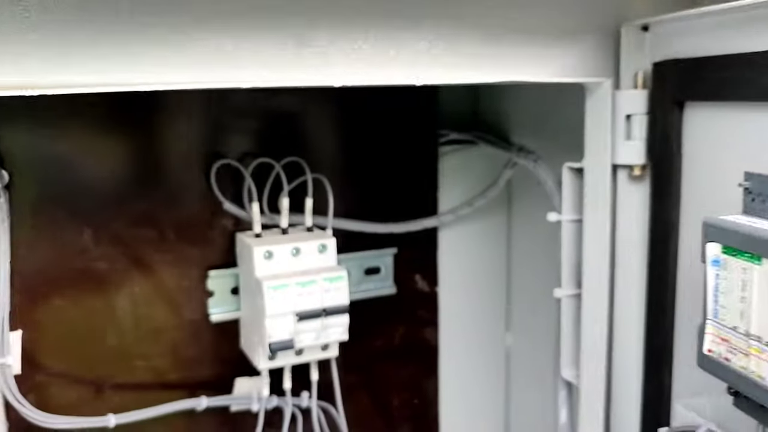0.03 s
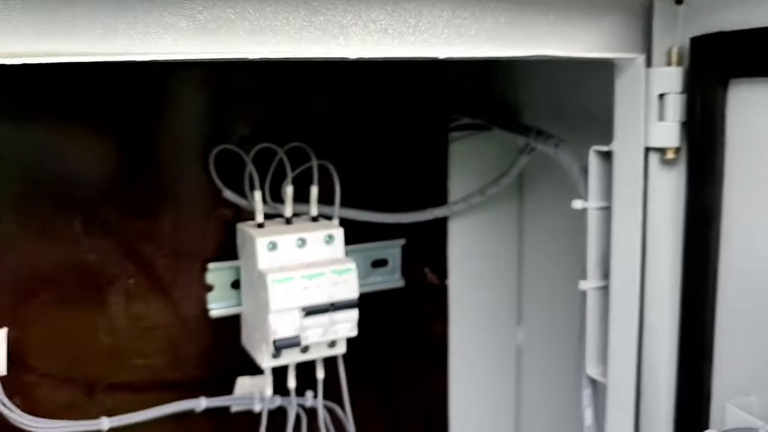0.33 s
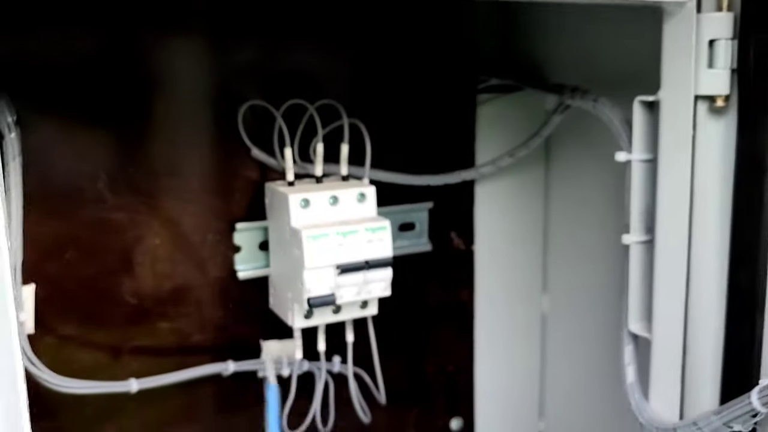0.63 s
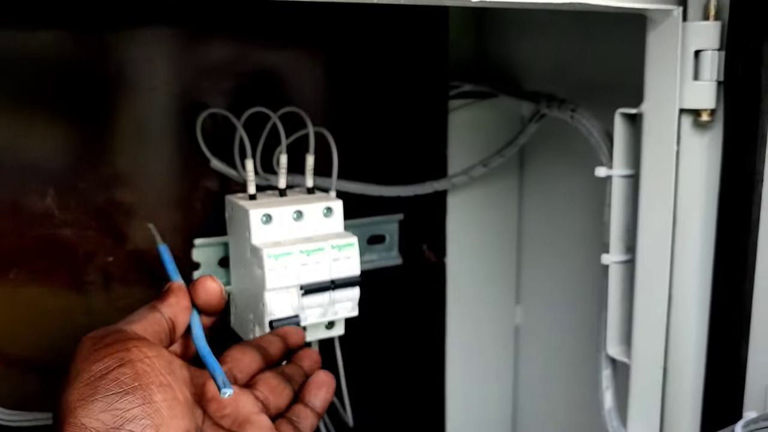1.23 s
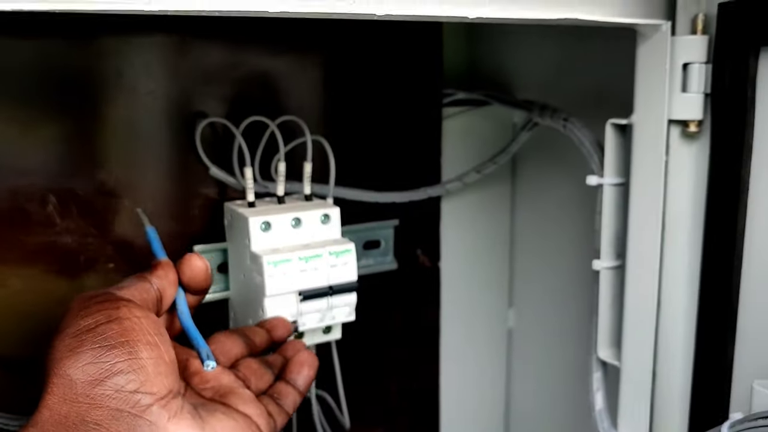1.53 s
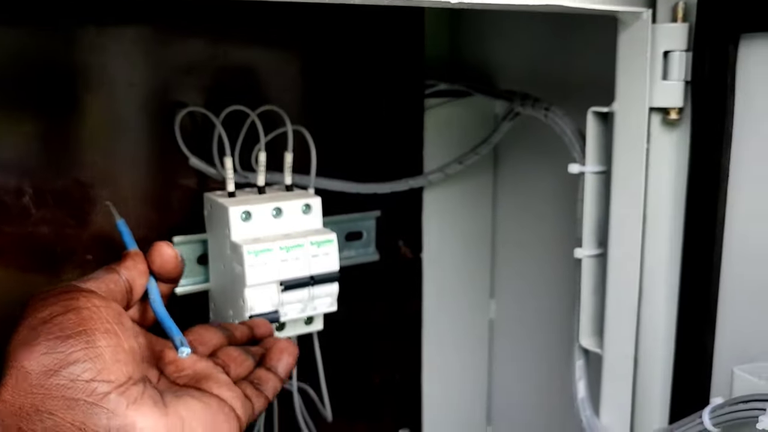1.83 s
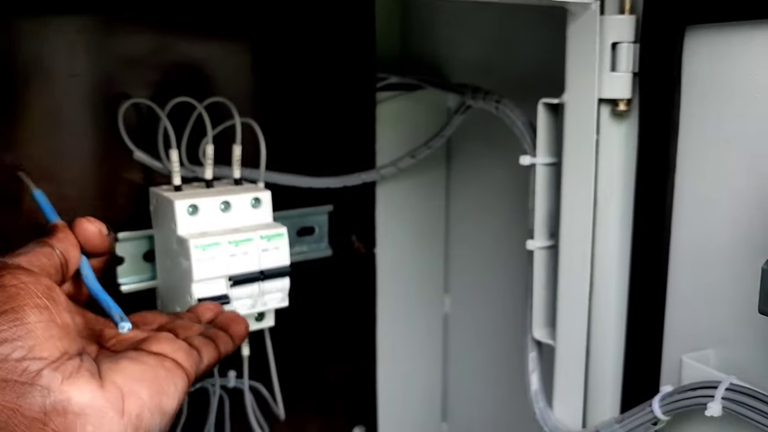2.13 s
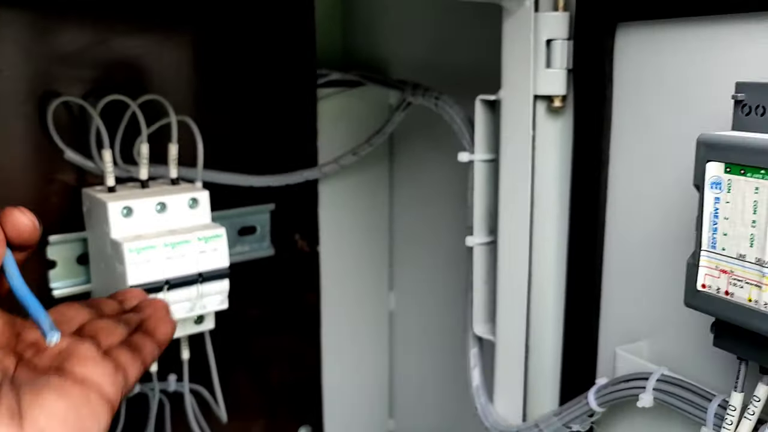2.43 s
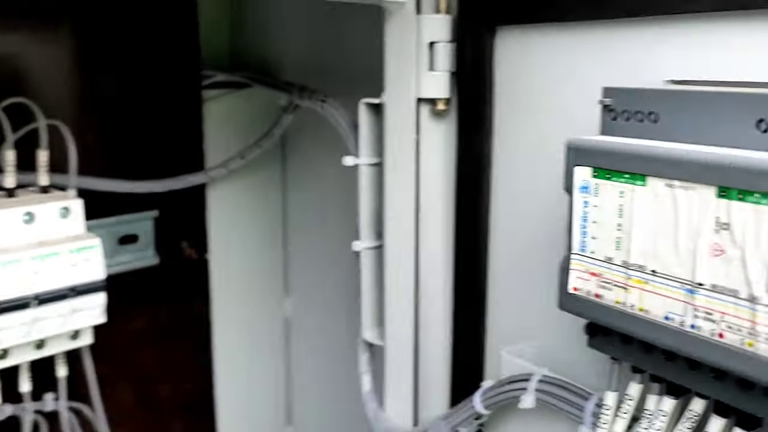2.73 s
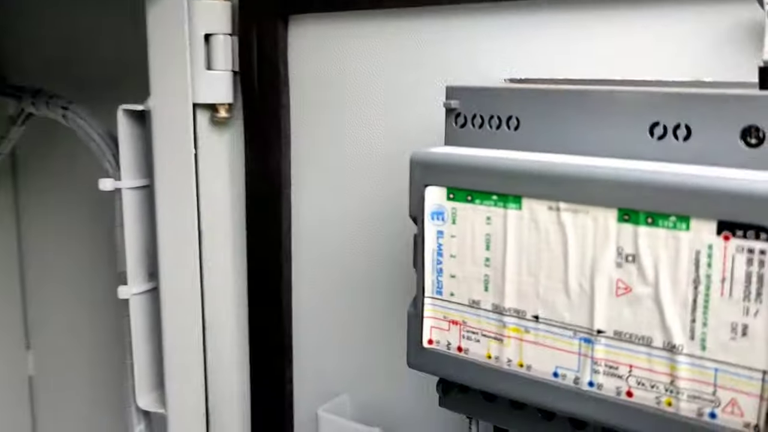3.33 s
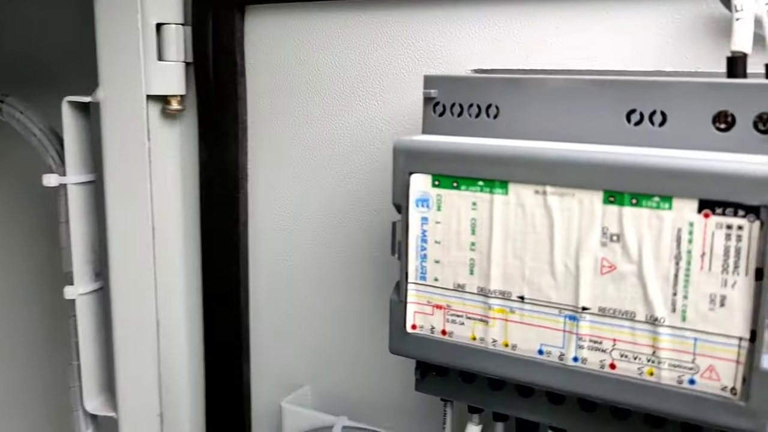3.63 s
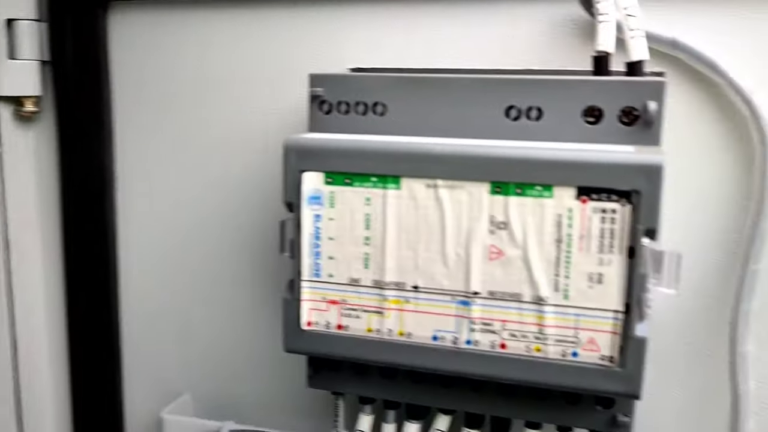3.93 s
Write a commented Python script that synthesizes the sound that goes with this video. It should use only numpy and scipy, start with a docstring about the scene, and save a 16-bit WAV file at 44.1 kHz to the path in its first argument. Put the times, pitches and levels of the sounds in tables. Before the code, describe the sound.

A circuit breaker snaps once at about 2.3 seconds, a sharp, close click that briefly rings its steel cabinet. Before it, mostly from 1 to 2 seconds, come light plastic ticks, scuffs and dull bumps. Soft knocks follow near 2.4 and 3.7 seconds. Underneath, a distant engine rumbles, swelling around 2.8 seconds, with faint outdoor hiss, a thin high whine and a few barely audible bird chirps.

```python
"""Circuit breaker in a steel cabinet

A finger pushes up a breaker's lever: the spring snaps it home and the cabinet rings briefly.
Small scuffs, ticks and soft bumps of handling come before and after, close to a phone at the open door.
A distant engine swells, its speed drifting, under outdoor hiss, a thin whine and a few far-off chirps."""
import sys
import numpy as np
from scipy import signal
from scipy.fft import rfft, irfft
from scipy.io import wavfile

SR = 44100
rng = np.random.default_rng(int(sys.argv[2]) if len(sys.argv) > 2 else 0)


def persist_wave(psi):
    """Save psi, clipped to +-1, as 16-bit WAV."""
    counts = np.round(np.clip(psi, -1, 1) * 32767).astype(np.int16)
    wavfile.write(sys.argv[1], SR, np.atleast_2d(counts).T)


N = 176400
T = np.arange(N) / SR
FREQS = np.maximum(np.arange(N // 2 + 1) * SR / N, 1)


def undb(db):
    """Decibels to gain."""
    return 10 ** (np.asarray(db) / 20)


def curve(rows, column=1):
    """A column of a table, joined by straight lines in time."""
    rows = np.array(rows)
    return np.interp(T, rows[:, 0], rows[:, column])


def over_hz(rows, hz=FREQS, column=1):
    """A column of a table, joined by straight lines in log frequency."""
    rows = np.array(rows)
    return np.interp(np.log(hz), np.log(rows[:, 0]), rows[:, column])


def shape(x, gain):
    """Filter by a gain for each frequency."""
    return irfft(rfft(x) * gain, N)


def colour(x, db):
    """Minimum-phase EQ with the given dB for each frequency."""
    cepstrum = irfft(np.log(undb(db)), N)
    cepstrum[..., 1:N // 2] *= 2
    cepstrum[..., N // 2 + 1:] = 0
    return shape(x, np.exp(rfft(cepstrum)))


def unit(x):
    """Scale to rms 1."""
    return x / np.sqrt(np.mean(x ** 2))


def unit_energy(x):
    """Scale a response to energy 1."""
    return unit(x) / np.sqrt(N)


def fade(t60):
    """Exponential decay, 60 dB down after t60 seconds."""
    return np.exp(-np.log(1000) * T / t60)


def pan(db):
    """Stereo gains that put the left db above the right."""
    return undb(np.array([[db], [-db]]) / 2)


def wander(rate_hz):
    """Smooth random motion of spread 1."""
    return unit(shape(rng.standard_normal(N), np.exp(-(FREQS / rate_hz) ** 2)))


def noise():
    """Stereo noise, nearly mono in the bass and wide above."""
    # Each row: frequency in Hz, correlation between the two microphone ports.
    likeness = [(60, 0.93), (130, 0.99), (290, 0.79), (630, 0.49), (1390, -0.39), (3000, 0.068),
                (14000, -0.28)]
    correlation = over_hz(likeness)
    mid = shape(rng.standard_normal(N), np.sqrt(1 + correlation))
    side = shape(rng.standard_normal(N), np.sqrt(1 - correlation))
    return unit(np.array([mid + side, mid - side]))


def strike(hits, response):
    """Trigger a stereo response at each hit, given as start in seconds and level in dB."""
    force = np.zeros(N)
    for start, db in hits:
        force[int(start * SR)] += undb(db)
    return signal.fftconvolve(force[None], response, axes=1)[:, :N]


def burst(spectrum, t60):
    """Response of a small damped object: a coloured, dying burst."""
    return unit_energy(colour(noise() * fade(t60), over_hz(spectrum)))


def reflections(rows):
    """Dense echoes in half-octave bands, each with its own decay."""
    source, out = noise(), 0
    for hz in 125 * 2 ** (np.arange(15) / 2):
        band = np.clip(1 - 2 * np.abs(np.log2(FREQS / hz)), 0, 1)
        out += shape(source, band) * undb(over_hz(rows, hz)) * fade(over_hz(rows, hz, column=2))
    return unit_energy(out)


def walls(x):
    """Quick echoes between the steel walls comb the sound."""
    wet = undb(-5)
    echo = signal.fftconvolve(x, unit_energy(noise() * fade(t60=0.057)), axes=1)[:, :N]
    return (x + wet * echo) / np.hypot(1, wet)


def engine():
    """Only the low orders of the uneven firing carry this far; each wavers, the upper ones most."""
    # Each row: time in seconds, shaft turns per second.
    speed = [(0, 24.5), (1, 27.5), (1.6, 25.9), (2.3, 26.7), (2.94, 26.25), (3.5, 24.1), (4, 25.5)]
    # Each row: time in seconds, level of the bass orders in dB, level of the upper orders in dB.
    levels = [(0, -53, -62.5), (1, -43, -58), (1.7, -41.5, -43.5), (2.3, -44, -45), (2.8, -35.5, -38),
              (3.3, -40.5, -41.5), (4, -36.5, -40)]
    # Each row: multiple of the shaft rate, relative level in dB.
    orders = [(1, -13), (2, -4), (3, -8), (4, -11), (5, -7), (6, -12), (7, -13), (8, -19.5), (9, -14),
              (10, -14.5), (11, -23.5), (12, -43), (14, -39.5)]
    turns = np.cumsum(curve(speed) * (1 + 0.01337 * wander(rate_hz=4.16))) / SR
    bass_db, upper_db, out = curve(levels), curve(levels, column=2), 0
    for order, db in orders:
        level_db, waver_depth = (bass_db, 0.43) if order <= 4 else (upper_db, 0.87)
        waver = 1 + waver_depth * (wander(7.1) + 1j * wander(4.7))
        tone = np.exp(2j * np.pi * (order * turns + rng.random()))
        out += undb(db + level_db) * unit(np.real(waver * tone))
    return out


def rumble():
    """The low bed of the surroundings."""
    # Each row: frequency in Hz, relative noise density in dB.
    spectrum = [(12, -3.5), (28, -3), (48, 9.5), (65, -4.5), (95, 3.5), (140, -11), (200, -15), (280, -8),
                (370, -28), (600, -26), (1500, -59.5)]
    # Each row: time in seconds, level in dB.
    levels = [(0, -43), (.8, -42.5), (2.2, -42), (2.8, -49), (4, -46)]
    return unit(colour(noise(), over_hz(spectrum))) * undb(curve(levels))


def outdoor_hiss():
    """Faint, restless hiss, coloured by the air resonances of the open cabinet."""
    # Each row: frequency in Hz, relative noise density in dB.
    spectrum = [(150, -4), (400, 1.5), (600, -2), (830, 2.2), (1100, 0.3), (1500, -0.5), (2300, -3.5),
                (2750, -3.5), (3150, -8), (3600, -5), (4800, -15.5), (6300, -19), (7400, -21), (8200, -21),
                (14000, -20.5)]
    # Each row: time in seconds, level in dB.
    levels = [(0, -56.5), (.85, -56.5), (1.2, -56), (2.25, -53.5), (2.55, -52.5), (2.8, -51), (3.55, -51.5),
              (3.85, -54.5), (4, -51)]
    # Each row: resonance in Hz, width in Hz, lift in dB.
    hollow = [(463, 40, 1.5), (808, 45, 4.5), (940, 63, -0.5), (2133, 150, 6), (2606, 104, 2)]
    hollow_db = sum(db / (1 + (2 * (FREQS - hz) / width) ** 2) for hz, width, db in hollow)
    air = unit(walls(colour(noise(), over_hz(spectrum) + hollow_db)))
    flicker_db = 1.25 * wander(rate_hz=8.2)
    return air * undb(curve(levels) + flicker_db) * pan(db=-1)


def whine():
    """A thin, distant band of high noise, perhaps insects."""
    # Each row: time in seconds, level in dB.
    levels = [(0, -74.5), (.6, -75.5), (1, -77), (2.2, -77.5), (2.6, -78.5), (3, -71.5), (3.35, -76.5),
              (3.6, -74), (4, -88)]
    centre_hz, half_width_hz = 7310, 230
    band = 1 / (1 + ((FREQS - centre_hz) / half_width_hz) ** 2)
    return unit(shape(noise(), band)) * undb(curve(levels))


def ticks():
    """Fingers and wire tap plastic: a crisp transient with a short tail."""
    # Each row: start in seconds, level in dB.
    taps = [(.2262, -32), (1.0185, -31), (1.352, -27), (1.359, -35), (1.478, -37.5), (1.8248, -29.5),
            (1.929, -33.5), (1.936, -35), (2.203, -42.5), (2.425, -39), (2.548, -35)]
    # Each row: frequency in Hz, relative level in dB.
    spectrum = [(500, -8), (1400, 1), (2500, 5), (4300, 6.5), (6500, 0.5), (10000, -2.5), (13000, 2.5)]
    transient = unit_energy(colour(signal.unit_impulse(N), over_hz(spectrum)))
    tail = undb(2) * burst(spectrum, t60=0.054)
    return strike(taps, transient + tail)


def chirps():
    """Short notes, probably birds, some gliding, all blurred by distance."""
    # Each row: centre in seconds, length in seconds, pitch in Hz, glide in Hz per second, level in dB.
    notes = [(0.48, 0.066, 2740, -2000, -66), (1.412, 0.057, 2700, 1500, -61.5),
             (1.578, 0.041, 3880, 0, -65), (1.786, 0.025, 2500, 0, -59), (2.195, 0.034, 2730, 0, -62.5),
             (2.267, .04, 2760, -1500, -63), (2.433, 0.029, 3510, -3000, -60),
             (2.702, 0.045, 3040, -7000, -58.5), (2.802, 0.025, 4260, 0.5, -64.5),
             (3.129, .04, 2620, 2500, -58.5), (3.25, .04, 3540, 0, -67), (3.316, .09, 2570, -1000, -59.5)]
    blur = 1 + np.array([wander(75) + 1j * wander(70) for _ in range(2)])
    out = 0
    for centre, length, hz, glide, db in notes:
        t = T - centre
        envelope = undb(db) * np.exp(-(2 * t / length) ** 2)
        out += envelope * np.exp(2j * np.pi * (hz * t + glide * t ** 2 / 2))
    return np.real(out * blur)


def scuffs():
    """Dry rubs of handling: a grainy stream of slips, heard as one resonance and a hiss."""
    # Each row: start in seconds, time until release in seconds, level in dB, resonance in Hz,
    # its half-width in Hz, hiss against the resonance in dB.
    rubs = [(1.014, 0.01, -48.5, 2630, 500, 2), (1.023, 0.011, -51, 2620, 260, -3.5),
            (1.046, 0.011, -53, 2570, 380, -1.5), (1.63, 0.012, -47, 3200, 420, 1.5),
            (1.646, 0.016, -51, 2900, 1000, 5.5), (1.669, 0.01, -49.5, 2500, 300, -1),
            (1.684, 0.022, -55, 2820, 900, 5), (2.938, 0.025, -44.5, 2570, 480, -1),
            (3.007, 0.025, -63, 2530, 700, 9), (3.656, 0.011, -41.5, 2180, 500, -0.5),
            (3.672, 0.027, -40, 2860, 560, -1.5), (3.707, 0.013, -52, 2750, 450, 0.5)]
    # Each row: frequency in Hz, relative noise density in dB.
    hiss_spectrum = [(300, -12), (900, -5), (1700, 5), (2900, 2), (3500, 6.5), (4300, 2), (5500, 0),
                     (8000, -6), (10000, -5), (13500, -2)]
    attack_s, release_s, grain_db, grain_samples = 0.0069, 0.0095, 3, 30
    grains = np.repeat(rng.standard_normal(N // grain_samples + 1), grain_samples)[:N]
    slips = noise() * undb(grain_db * grains)
    hiss, out = unit(colour(slips, over_hz(hiss_spectrum))), 0
    for start, length, db, hz, half_width, hiss_db in rubs:
        detuning = hz / (2 * half_width) * (FREQS / hz - hz / FREQS)
        body = unit(shape(slips, 1 / (1 + 1j * detuning) ** 2))
        attack = np.clip((T - start) / attack_s, 0, 1)
        release = np.exp(-np.maximum(T - start - length, 0) / release_s)
        out += undb(db) * attack * release * (body + undb(hiss_db) * hiss)
    return walls(out) * pan(db=-0.5)


def bumps():
    """The hand knocks softly on the cabinet: dull thuds of noise."""
    # Each row: start in seconds, level in dB, spectral peak in Hz.
    knocks = [(1.195, -24.5, 400), (1.413, -25, 350), (1.442, -23.5, 370), (1.64, -22.5, 400),
              (1.929, -18, 380), (2.425, -20, 920), (3.662, -17, 940)]
    press_s, slope_db_per_octave = 0.0049, 11.5
    envelope, out = fade(t60=0.097) * (1 - np.exp(-T / press_s)), 0
    for start, db, hz in knocks:
        thud = colour(noise() * envelope, -slope_db_per_octave * np.abs(np.log2(FREQS / hz)))
        out += strike([(start, db)], unit_energy(thud))
    return out


def breaker():
    """Each impact cracks and rings the housing; the hardest one shakes the cabinet through the rail."""
    # Latch, lever, closing contacts and rebounds. Each row: start in seconds, level in dB.
    impacts = [(2.2853, -19), (2.2881, -19), (2.2888, -5), (2.2897, 5), (2.2926, -12), (2.2965, -10.5),
               (2.3005, -11), (2.304, -21)]
    # Each row: frequency in Hz, relative noise density in dB.
    crack_spectrum = [(300, -27), (1000, -18), (1600, -2), (2200, -9), (3700, 13.5), (5500, 0.5),
                      (8300, 11), (11000, -5), (13000, 7.5)]
    # The plastic housing. Each row: pitch in Hz, relative level in dB, t60 in seconds.
    housing_modes = [(1720, -5, 0.057), (2000, -10, 0.089), (2180, -18.5, 0.034), (2700, -11, .06),
                     (3080, -13, 0.072), (3700, 0, 0.034), (4330, -11, 0.08), (6170, -19, .07),
                     (7600, -4, 0.032), (8300, -2, 0.04), (8800, -15, .07), (10750, -14, 0.03),
                     (13530, -7, 0.03)]
    # Echoes inside the cabinet, then the lingering ring of its sheet metal.
    # Each row: frequency in Hz, relative noise density in dB, t60 in seconds.
    inside = [(150, -12, 0.13), (280, 1, .1), (420, 14, 0.083), (590, -5, 0.15), (975, 6.5, 0.12),
              (1400, 3, 0.15), (2000, -0.5, 0.11), (2900, 3, 0.12), (4000, 1, 0.11), (6000, -5, 0.09),
              (8400, -6.5, 0.1), (13900, 5.5, 0.029)]
    linger = [(197, 8, 1), (563, 1, 0.73), (970, -0.5, 0.85), (1600, -2, 0.41), (3180, -6, 0.33),
              (6000, -38, 0.19), (14000, -24, .2)]
    # The steel back plate and walls.
    # Each row: pitch in Hz, relative level in dB, t60 in seconds, left minus right in dB.
    steel_modes = [(104.8, -4.5, 0.34, -2), (122.5, -4, 0.53, 2.5), (280, -23, 0.44, 0),
                   (339, -12.5, 0.31, -7), (366, 5, 0.13, -2), (413, 0.5, 0.11, 3), (465, -17.5, .24, 2),
                   (669, -10, 0.2, 12), (692, -19, 0.3, 6), (858, -22, 0.44, 0), (936, -12.5, 0.39, -2),
                   (1010, -3.5, 0.063, -2), (1154, -21, 0.28, 1), (1218, -18, 0.42, -4)]
    swell_s, steel_lag_s, steel_db = 0.0014, 0.002825, -27.5
    housing = sum(undb(db) * fade(t60) * np.sin(2 * np.pi * (hz * T + rng.random((2, 1))))
                  for hz, db, t60 in housing_modes)
    click = undb(-4) * burst(crack_spectrum, t60=0.006) + undb(-31) * housing
    echoes = undb(-1.5) * reflections(inside) + undb(-8) * reflections(linger)
    steel = sum(undb(db) * pan(pan_db) * fade(t60) * np.sin(2 * np.pi * hz * T)
                for hz, db, t60, pan_db in steel_modes)
    swell = 1 - np.exp(-T / swell_s)
    hardest_s = max(impacts, key=lambda row: row[1])[0]
    snap = strike(impacts, click + echoes * swell)
    return snap + strike([(hardest_s + steel_lag_s, steel_db)], steel * swell)


def scene():
    """The outdoor bed, the handling and the snap, mixed at the cabinet door."""
    bed = engine() + rumble() + outdoor_hiss() + whine()
    return bed + ticks() + chirps() + scuffs() + bumps() + breaker()


def record(dry):
    """Each microphone port of the phone has its own colour; the top is cut steeply."""
    # Each row: frequency in Hz, left minus right in dB.
    ports = [(100, 1.2), (380, -3), (690, 1.5), (1280, -1.5), (2350, -8.5), (4300, -3.5), (6300, 4),
             (7400, 9), (8200, 12.5), (9800, 4.5), (11300, -3), (13500, 1)]
    top_hz = 14300
    lean_db = over_hz(ports) / 2
    heard = colour(dry, np.array([lean_db, -lean_db]))
    return signal.sosfilt(signal.ellip(10, .2, 80, top_hz, fs=SR, output="sos"), heard)


dry = scene()
out = record(dry)
persist_wave(out)
```